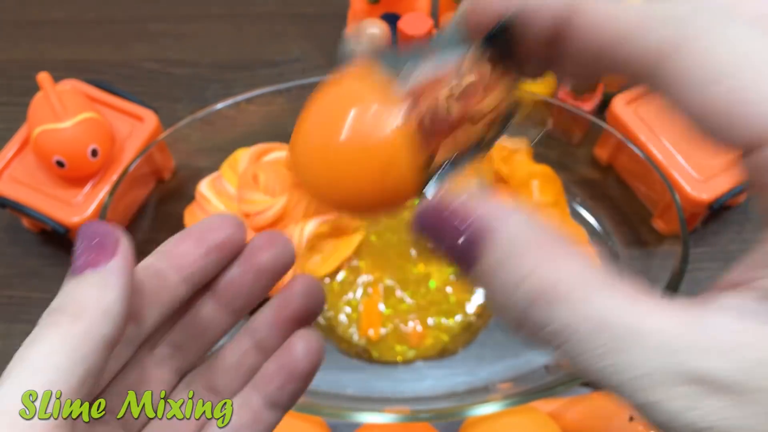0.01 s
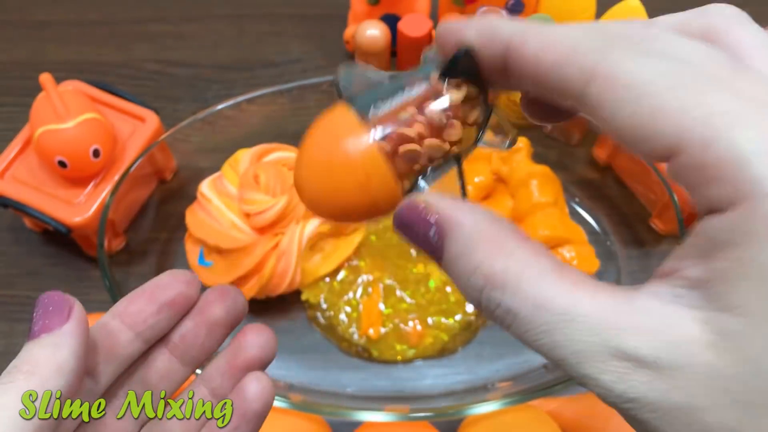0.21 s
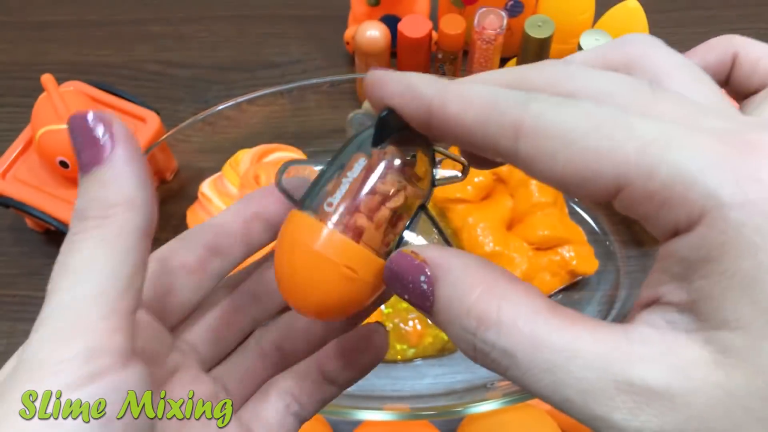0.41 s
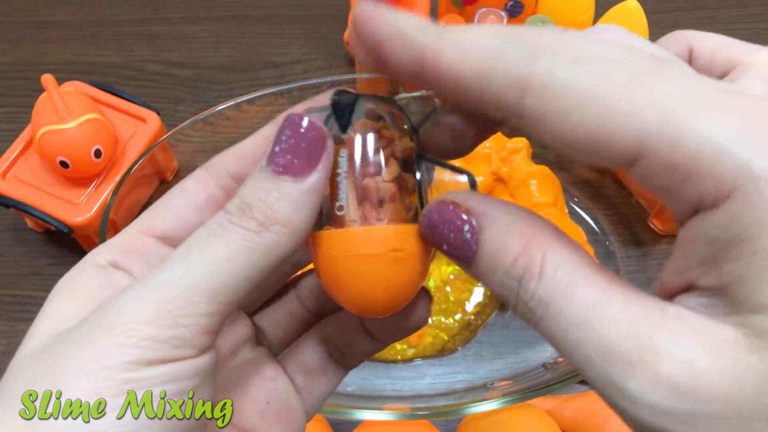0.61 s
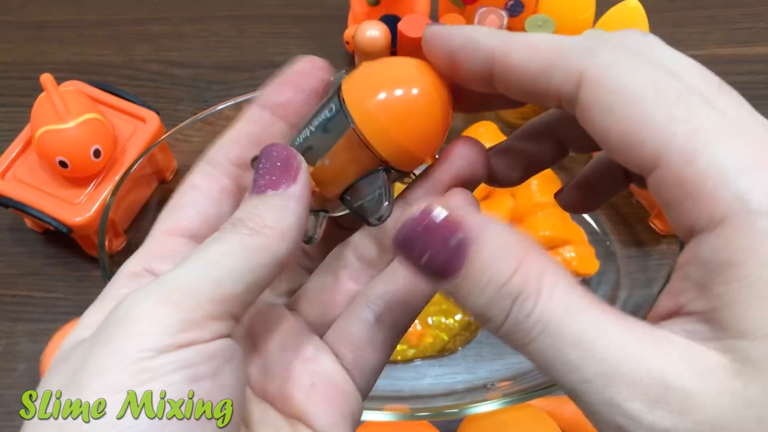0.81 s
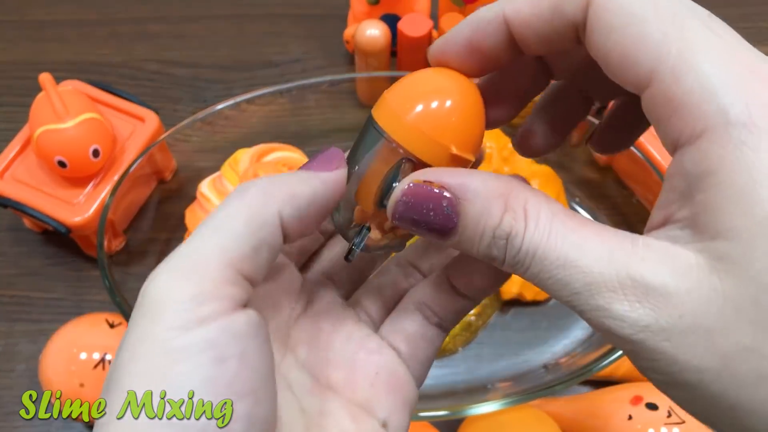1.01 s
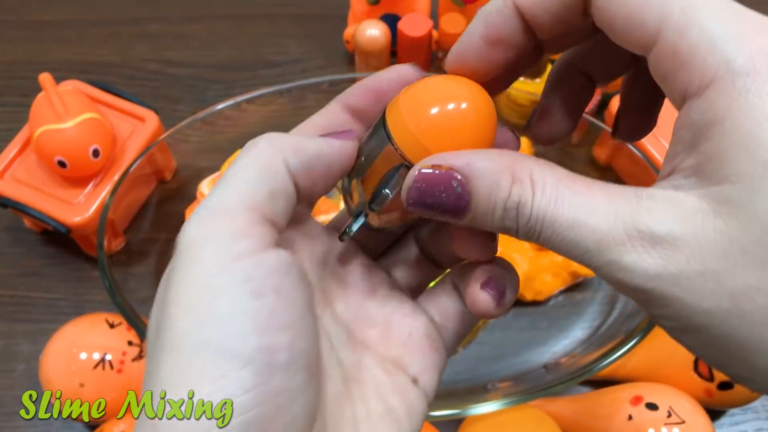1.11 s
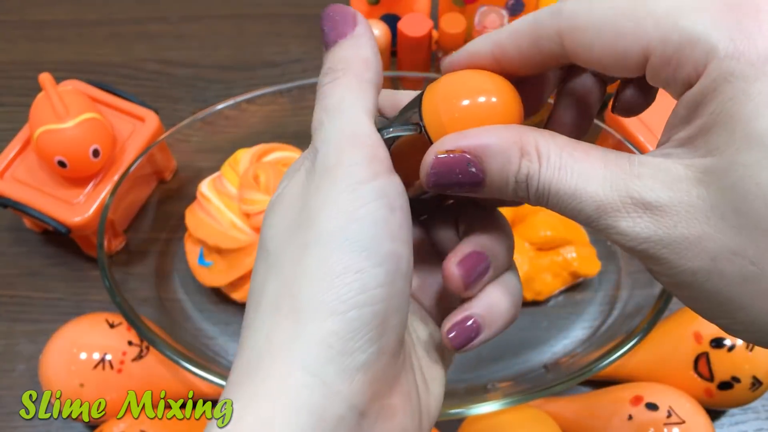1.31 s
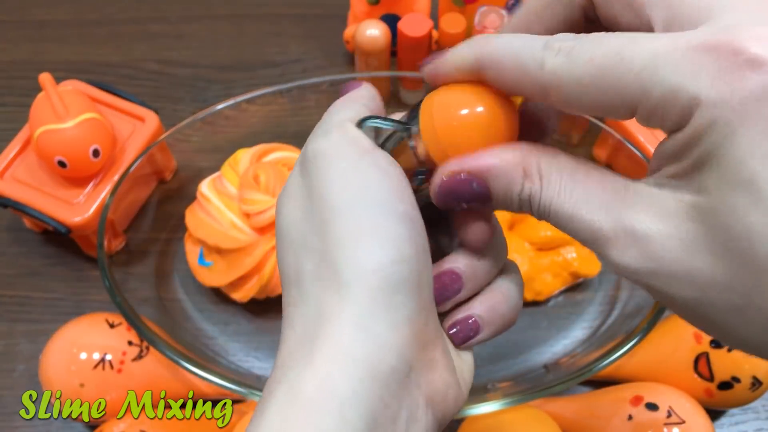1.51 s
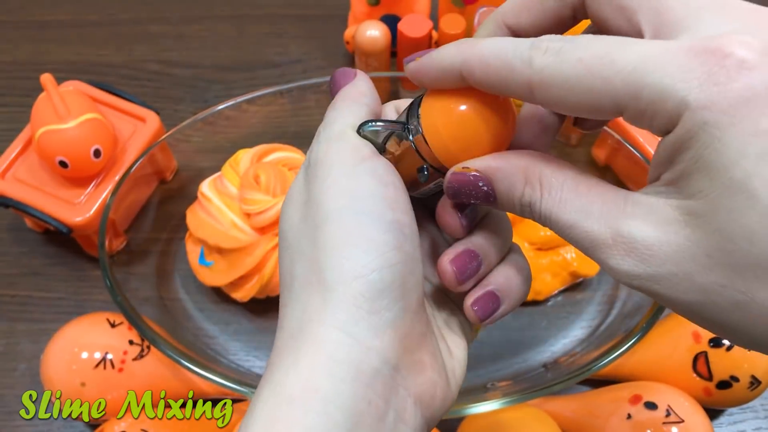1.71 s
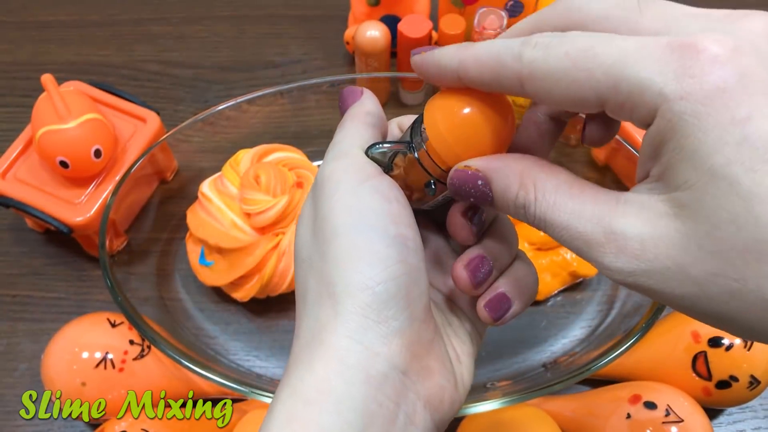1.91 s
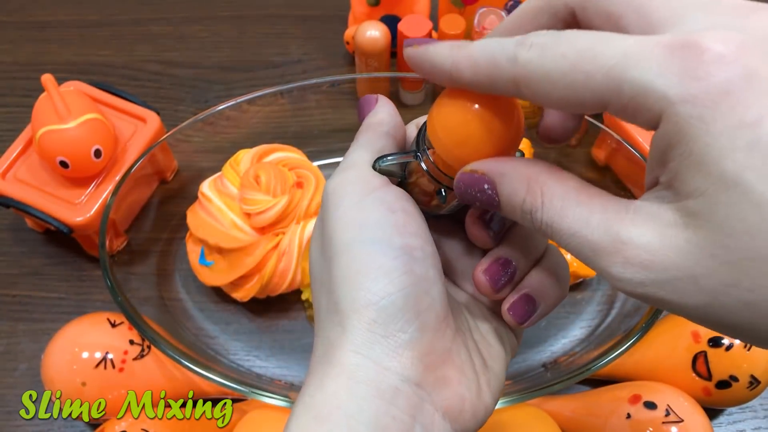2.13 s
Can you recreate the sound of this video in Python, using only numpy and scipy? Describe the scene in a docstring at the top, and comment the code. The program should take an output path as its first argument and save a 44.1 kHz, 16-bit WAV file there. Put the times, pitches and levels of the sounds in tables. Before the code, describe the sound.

Close to the microphone in a quiet, lightly echoing room, bits rattle brightly in a little plastic container, skin rubs it, faint ticks follow, then a sharp snap and loose hollow plastic clacks.

```python
"""A quiet room, where a small plastic capsule of tiny pieces is shaken four times close to the microphone.
Fingers slide round it and pick at the cap, which ticks and crackles, then snaps open.
The loosened parts knock hollowly against each other. The pieces and the sliding are shaped noise;
the ticks and knocks are short blows that ring the plastic."""
import sys
import numpy as np
from scipy import signal
from scipy.io import wavfile
from scipy.ndimage import uniform_filter1d

SR = 44100
rng = np.random.default_rng(int(sys.argv[2]) if len(sys.argv) > 2 else 0)


def digitize_waveform(pressure):
    """Quantize a signal to 16-bit integers and store it at the path in sys.argv[1].

    Rows of a 2-D input are taken as channels; values are limited to [-1, 1].
    """
    field = np.atleast_2d(pressure).T
    bounded = np.clip(field, -1, 1)
    quanta = np.round(bounded * 32767).astype(np.int16)
    wavfile.write(sys.argv[1], SR, quanta)


N = 97020
TIME = np.arange(N) / SR  # seconds
HIT_TIME = TIME[:SR // 25]  # one blow lasts at most 40 ms
BAND_EDGES = 20 * 2 ** (np.arange(30) / 3)  # third-octave steps, Hz


def amp(db):
    """Turn decibels into gain."""
    return 10 ** (np.asarray(db) / 20)


def unit(x):
    """Scale to an average (rms) level of 1."""
    return x / np.sqrt(np.mean(x ** 2) + 1e-30)


def at_hz(points, hz):
    """Read a curve at one frequency, in between its points on a log scale."""
    f, v = np.transpose(points)
    return np.interp(np.log(hz), np.log(f), v)


def level(points):
    """Turn a level curve in dB into gain over time."""
    return amp(np.interp(TIME, *np.transpose(points)))


def low_cut(x, hz):
    """Take the bass away."""
    return signal.sosfilt(signal.butter(2, hz, "high", fs=SR, output="sos"), x)


def band_pass(x, low, high):
    """Keep only what lies between two frequencies."""
    return signal.sosfilt(signal.butter(2, [low, high], "band", fs=SR, output="sos"), x)


def bands(source):
    """Ask source(centre Hz) for a signal in each third-octave band, filter it to that band and add up."""
    total = 0
    for low, high in zip(BAND_EDGES, BAND_EDGES[1:]):
        centre = np.sqrt(low * high)
        total = total + band_pass(source(centre) + 1e-18, low, high)
    return total


def noise(spectrum):
    """Smooth coloured noise, rms 1."""
    return unit(bands(lambda hz: amp(at_hz(spectrum, hz)) * rng.standard_normal(N)))


GRAIN_COLOUR_DB = 5  # each impact is up to this much stronger or weaker in each band


def grains(spectrum, per_s, spread_db, size):
    """Random tiny impacts, each with its own colour; their level is evened over size samples."""
    happens = rng.random(N) < per_s / SR
    strength = amp(spread_db * np.minimum(rng.exponential(1, N), 4))
    clicks = happens * strength
    clicks = clicks / np.sqrt(np.abs(uniform_filter1d(clicks ** 2, size)) + 1e-4)

    def coloured(hz):
        colour = GRAIN_COLOUR_DB * (2 * rng.random(N) - 1)
        sign = np.sign(rng.standard_normal(N))
        return amp(at_hz(spectrum, hz) + colour) * clicks * sign
    return unit(bands(coloured))


def ring(modes):
    """One blow makes every mode (natural tone) ring and die away, each starting up or down at random."""
    total = np.zeros(len(HIT_TIME))
    for hz, db, t60 in modes:
        if hz < SR / 2:
            sign = np.sign(rng.standard_normal())
            fading = amp(db - 60 * HIT_TIME / t60)
            total += sign * fading * np.sin(2 * np.pi * hz * HIT_TIME)
    return total


CRACK_RISE_S, CRACK_FALL_S = 0.0001, 0.001


def crack(hz):
    """The brief rough contact that starts a blow: a burst of noise around hz."""
    shape = np.exp(-HIT_TIME / CRACK_FALL_S) * (1 - np.exp(-HIT_TIME / CRACK_RISE_S))
    burst = rng.standard_normal(len(HIT_TIME)) * shape
    return unit(band_pass(burst, hz * 0.41, min(hz * 1.46, 0.4 * SR)))


def add(out, s, db, hit):
    """Place a blow at s seconds; db is the level of its whole energy packed into one millisecond."""
    i = int(s * SR)
    hit = amp(db) * hit * np.sqrt(SR / 1000 / np.sum(hit ** 2))
    out[i:i + len(hit)] += hit[:N - i]


# Colour of the quiet room. Each row: frequency in Hz, strength in dB per Hz.
ROOM_TONE_COLOUR = [(22, -46), (40, -19), (60, 5), (90, 3.5), (170, -2.5), (300, -6.5), (600, -14.5),
                    (1500, -21), (4000, -31), (9000, -34.5), (15500, -40)]
ROOM_TONE_DB, HUM_HZ, HUM_DB = -67, 129.7, -72.5


def room_tone():
    """The steady background: soft coloured noise and a faint hum on one pitch."""
    hum = amp(HUM_DB) * np.sqrt(2) * np.sin(2 * np.pi * HUM_HZ * TIME)
    return amp(ROOM_TONE_DB) * noise(ROOM_TONE_COLOUR) + hum


# How strongly the room answers. Each row: frequency in Hz, level in dB.
ROOM_LEVEL = [(200, -13.5), (1000, -11.5), (2300, -8), (4500, -12.5), (8000, -14.5), (15000, -14)]
# How long the answer lasts. Each row: frequency in Hz, time to fall by 60 dB in seconds.
ROOM_T60 = [(200, 0.41), (2500, 0.56), (7000, 0.55), (15000, 0.3)]
ROOM_DELAY_S = 0.0036


def room(x):
    """Echoes too dense to tell apart: a fading noise tail that lasts longest in the middle range."""
    t = TIME[:SR * 3 // 4]

    def tail(hz):
        decay = amp(-60 * t / at_hz(ROOM_T60, hz)) * (t > ROOM_DELAY_S)
        decay = decay / np.linalg.norm(decay)
        return amp(at_hz(ROOM_LEVEL, hz)) * decay * rng.standard_normal(len(t))
    return signal.fftconvolve(x, bands(tail))[:N]


# Skin sliding on the plastic. Each row: time in seconds, level in dB.
SLIDE = [(0, -78), (.18, -78), (.33, -71), (.40, -59), (.50, -61), (.62, -59), (.68, -60.5), (.75, -59.5),
         (.775, -76), (2.2, -68)]
# Colour of the sliding skin. Each row: frequency in Hz, strength in dB per Hz.
SKIN_COLOUR = [(100, 6), (250, 11.5), (500, 8.5), (1000, 2), (2500, -4), (8500, -1), (15500, -7)]


def sliding_fingers():
    """Skin rubbing on plastic makes a smooth noise that swells and fades."""
    return level(SLIDE) * noise(SKIN_COLOUR)


# Fine crackle of the strained and sliding cap. Each row: time in seconds, level in dB.
STRAIN = [(0, -75), (.18, -75.5), (.83, -71), (.88, -73.5), (.96, -77), (1.02, -58.5), (1.085, -72.5),
          (1.135, -62), (1.22, -81), (1.31, -65.5), (1.375, -62), (1.44, -59), (1.49, -71), (1.66, -78.5),
          (1.70, -48), (1.712, -40.5), (1.73, -50), (1.80, -50.5), (1.88, -61.5), (2.03, -79.5),
          (2.075, -63), (2.11, -75), (2.2, -69)]
# Colour of the crackle. Each row: frequency in Hz, strength in dB per Hz.
CRACKLE_COLOUR = [(300, -18), (1200, -8), (3000, -4), (5200, 2.5), (6400, -11), (8000, 2), (11000, -11),
                  (13000, -4), (15500, -10)]
CRACKLES_PER_S, CRACKLE_SPREAD_DB = 900, 0.5


def strained_cap():
    """The strained, sliding cap gives off many tiny crackles."""
    return level(STRAIN) * grains(CRACKLE_COLOUR, CRACKLES_PER_S, CRACKLE_SPREAD_DB, size=900)


# Natural tones of the seal's pop. Each row: frequency in Hz, level in dB,
# time to fall by 60 dB in seconds.
POP_MODES = [(280, -4, 0.0058), (620, -13.5, 0.0048), (1060, 0.5, 0.0028), (2400, -7, 0.0033)]
POP_S, POP_DB = 1.6921, -36
POP_LOW_HZ, POP_TOP_HZ = 172, 5000  # bass below and treble above these are taken away


def seal_pop():
    """The seal lets go with a dull pop just before the snap."""
    out = np.zeros(N)
    pop = low_cut(ring(POP_MODES), POP_LOW_HZ)
    dull = signal.sosfilt(signal.butter(2, POP_TOP_HZ, fs=SR, output="sos"), pop)
    add(out, POP_S, POP_DB, dull)
    return out


# The loose cap knocks on the hollow body. Each row: start in seconds, level in dB before the bass
# is taken away, pitch in Hz, tilt of the overtones above the pitch in dB per octave.
KNOCKS = [(1.5171, -43, 2190, -2.5), (1.668, -50, 3230, -2), (1.702, -40, 3170, -4),
          (1.7050, -30.5, 1207, 2), (1.7064, -27.5, 2120, 5), (1.7102, -36, 2020, 4),
          (1.7684, -26.5, 2250, -6), (1.7989, -31.5, 2164, -5), (1.8002, -27, 2310, 0),
          (1.829, -42, 2420, -6), (1.8519, -44, 2470, -16), (1.8547, -38.5, 2330, -14),
          (1.858, -41, 2350, -11), (1.862, -38.5, 2220, -4), (1.866, -41, 2170, -8),
          (2.0487, -47.5, 1900, 0), (2.0614, -44.5, 2500, -1.5), (2.075, -47, 2800, 1),
          (2.1213, -32, 3075, -1), (2.1211, -45.5, 1280, -2), (2.1219, -36.5, 2290, 1.5),
          (2.1668, -44, 2400, 0), (2.1788, -40.5, 2340, -1.5), (2.1811, -43.5, 2250, 4.5)]
# Natural tones of the hollow body. Each row: ratio to the pitch, level in dB,
# time to fall by 60 dB in seconds.
HOLLOW_MODES = [(.58, -16.5, 0.0053), (.89, -11, 0.0074), (1, -4, 0.0086), (1.27, -6.5, 0.0056),
                (1.85, -9, 0.0062), (2.4, -13, 0.0038), (3.35, -12.5, 0.0039), (5.1, -16, 0.0034)]
KNOCK_RISE_S = 0.00031  # time for a knock's ringing to swell in
KNOCK_CRACK_DB = -10  # for a tilt of 0; a brighter tilt cracks louder
KNOCK_LOW_HZ = 1330  # bass below this is taken away, leaving the knocks thin and light


def cap_knocks():
    """The cap knocks on the body and makes it ring; the pitch shifts with the grip."""
    out = np.zeros(N)
    swell = 1 - np.exp(-HIT_TIME / KNOCK_RISE_S)
    for s, db, pitch, tilt in KNOCKS:
        modes = [(pitch * ratio, mode_db + tilt * max(np.log2(ratio), 0), t60)
                 for ratio, mode_db, t60 in HOLLOW_MODES]
        contact = amp(KNOCK_CRACK_DB + 2 * tilt) * crack(2 * pitch)
        add(out, s, db, unit(swell * ring(modes)) + contact)
    return low_cut(out, KNOCK_LOW_HZ)


# Sharp ticks and snaps of the shell. Each row: start in seconds, level in dB before the bass
# is taken away, brightest frequency in Hz, width around it in octaves.
TICKS = [(0.038, -57.5, 8000, 1.5), (0.044, -59.5, 8000, 1.5), (0.2048, -33, 8440, 0.45),
         (.2195, -24.5, 11000, 0.56), (.2455, -21.5, 9250, 0.27), (0.2556, -31.5, 9000, 0.51),
         (0.3075, -37, 9000, 0.6), (0.3498, -22, 11100, 0.7), (0.4117, -33, 7000, 2.3),
         (0.4413, -23.5, 11000, 0.65), (.5018, -39, 9000, .8), (0.5046, -36.5, 9000, .9),
         (0.531, -19.5, 9600, 0.44), (0.613, -36, 5500, 0.89), (.6200, -39, 12000, 2.7),
         (0.628, -35.5, 9000, 1.5), (.8537, -47.5, 11800, 1.1), (.8600, -46.5, 11000, 1.4),
         (.8706, -40.5, 6800, 1.3), (0.8905, -54.5, 8950, 0.9), (0.981, -43, 9150, 0.23),
         (0.9947, -40, 8040, 0.14), (1.0202, -30.5, 8200, 0.48), (1.0130, -47, 8000, .6),
         (1.0173, -43.5, 8200, 0.55), (1.0317, -49, 10000, 0.67), (1.0651, -48, 9000, .6),
         (1.0478, -43, 9000, 0.6), (1.0533, -44, 10100, 0.51), (1.1003, -52, 7850, 1.2),
         (1.1368, -45, 8000, 0.81), (1.139, -48, 10000, 1.4), (1.1695, -49, 9000, 1.1),
         (1.1939, -33.5, 10500, .6), (1.2522, -43, 8400, 0.55), (1.3021, -48.5, 9950, 1.9),
         (1.3389, -50, 7000, 1.6), (1.3545, -43, 5500, 0.34), (1.3548, -37, 10400, 0.18),
         (1.365, -45.5, 13000, 0.52), (1.3898, -42.5, 5230, 0.36), (1.3901, -37.5, 10100, 0.22),
         (1.4228, -48, 6500, 0.77), (1.4405, -50, 8000, 1.2), (1.443, -52, 11000, .9),
         (1.484, -52, 7000, 1.9), (1.5173, -48.5, 13000, 1.3), (1.7049, -19, 3900, 0.74),
         (1.7068, -19.5, 8500, 1.6), (1.7100, -31.5, 7000, 1.6), (1.7122, -39, 9000, 1.3),
         (1.788, -43, 7500, 0.18), (1.8035, -40, 7700, 0.22), (1.821, -34.5, 11400, 0.12),
         (1.824, -35, 14400, 0.11), (1.8410, -46, 11500, 0.42), (1.8897, -43.5, 4670, 0.43),
         (1.909, -49.5, 6940, 0.61), (2.1210, -35.5, 7200, 0.22), (2.1216, -32.5, 5200, 0.31)]
# Natural tones of the shell. Each row: frequency in Hz, level in dB, time to fall by 60 dB in seconds.
SHELL_MODES = [(1120, -2, 0.0025), (2080, -7.5, 0.0087), (2980, -6.5, 0.0063), (4220, -3, 0.0088),
               (5396, 1, 0.0045), (6890, -5.5, 0.0066), (7810, -2, 0.0045), (8950, 0, 0.0042),
               (10040, -3.5, 0.0056), (11300, 3.5, 0.0036), (12500, 3, 0.002), (14300, 9, 0.0014)]
TICK_CRACK_DB = -8.5  # compared with the ringing
TICK_LOW_HZ = 1070  # bass below this is taken away, leaving the ticks thin and light


def shell_ticks():
    """Each tick rings the shell, favouring the tones near its own brightest frequency."""
    out = np.zeros(N)
    for s, db, bright, width in TICKS:
        modes = []
        for hz, mode_db, t60 in SHELL_MODES:
            distance = np.log2(hz / bright) / width
            modes.append((hz, mode_db - 20 * np.log10(1 + distance ** 2), t60))
        add(out, s, db, unit(ring(modes)) + amp(TICK_CRACK_DB) * crack(bright))
    return low_cut(out, TICK_LOW_HZ)


# The pieces land on one end of the capsule, several surges to a shake.
# Each row: peak time in seconds, level in dB, rise in seconds, fall in seconds.
SURGES = [(0.189, -50, 0.0033, .008), (.207, -34, 0.0046, 0.0094), (0.218, -32.5, .003, 0.0033),
          (0.2403, -25, 0.006, 0.0038), (.319, -30.5, 0.0067, 0.0084), (.3515, -26, .005, 0.0091),
          (.419, -34, 0.0088, 0.0078), (0.4463, -27, 0.0085, 0.0071), (0.505, -36, 0.0064, 0.011),
          (.523, -31, 0.0044, 0.0034), (0.5315, -29, 0.0051, 0.0069), (.582, -41.5, .002, .003),
          (0.605, -40, 0.0079, .005), (.622, -46.5, .007, .005)]
# Colour of the rattle. Each row: frequency in Hz, strength in dB per Hz.
RATTLE_COLOUR = [(200, -26), (700, -24.5), (1200, -21), (2200, -12), (4000, -9.5), (6000, -5.5), (8500, 1),
                 (11000, -3), (15500, -4.5)]
PIECES_PER_S, PIECE_SPREAD_DB = 3600, 5


def rattle():
    """Each surge of the pieces swells and dies as a shower of tiny impacts."""
    power = np.zeros(N)
    for s, db, rise, fall in SURGES:
        away = np.maximum((s - TIME) / rise, (TIME - s) / fall)  # grows before and after the peak
        power += (amp(db) * np.exp(-away)) ** 2
    return np.sqrt(power) * grains(RATTLE_COLOUR, PIECES_PER_S, PIECE_SPREAD_DB, size=130)


KNOCK_ROOM_DB = 0.5  # extra level of the pop and knocks sent into the room


def scene():
    """The capsule sounds directly and through the room, over the room tone."""
    shell = rattle() + shell_ticks() + sliding_fingers() + strained_cap()
    knocks = cap_knocks() + seal_pop()
    echoes = room(shell + amp(KNOCK_ROOM_DB) * knocks)
    return (shell + knocks + echoes + room_tone())[None]


MIC_LOW_HZ, CUTOFF_HZ = 38, 16000


def record(dry):
    """The microphone drops the deepest bass; the top is cut steeply."""
    steep = signal.ellip(10, 0.2, 80, CUTOFF_HZ, fs=SR, output="sos")
    return signal.sosfilt(steep, low_cut(dry, MIC_LOW_HZ))


dry = scene()
out = record(dry)
digitize_waveform(out)
```